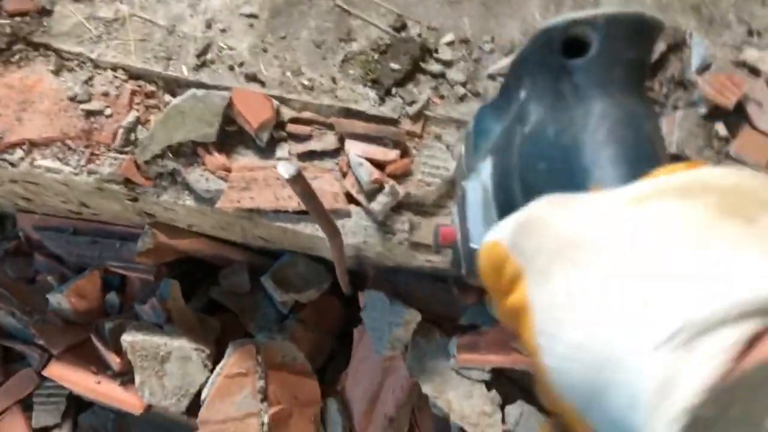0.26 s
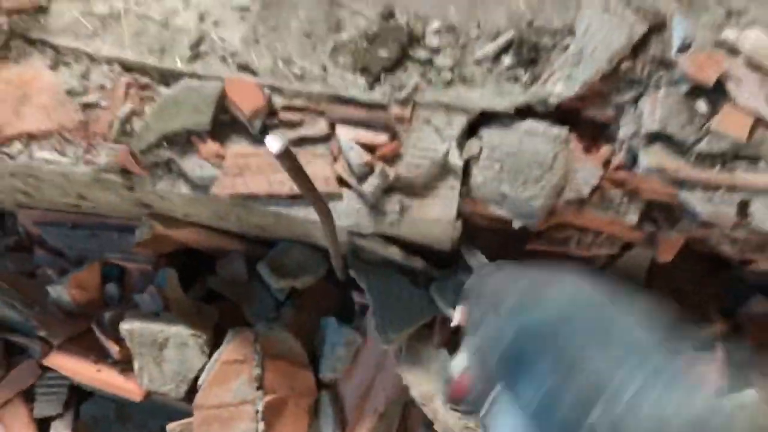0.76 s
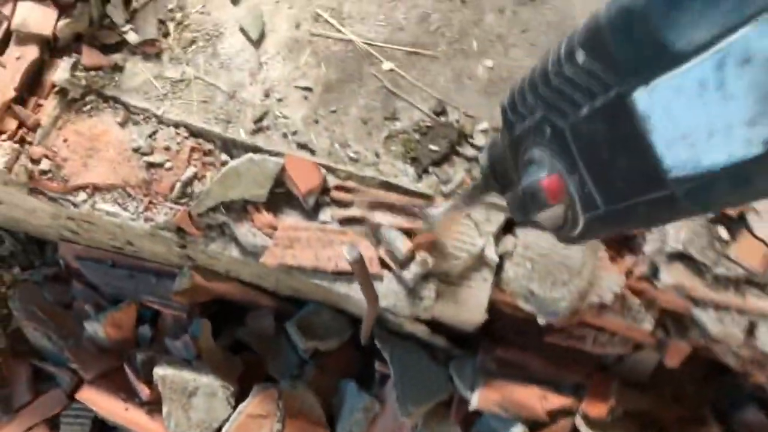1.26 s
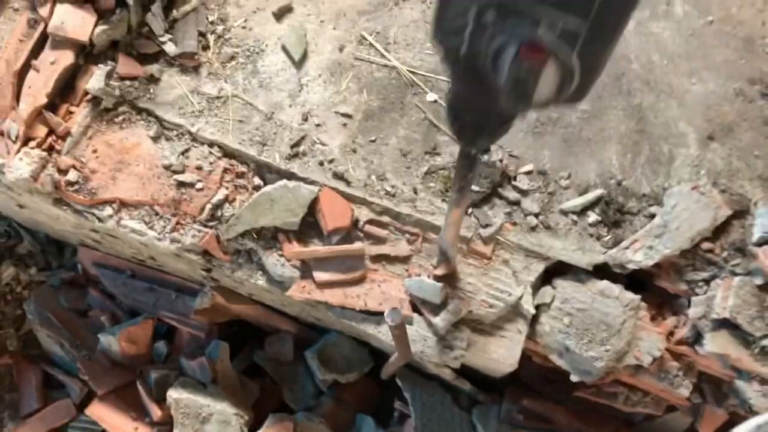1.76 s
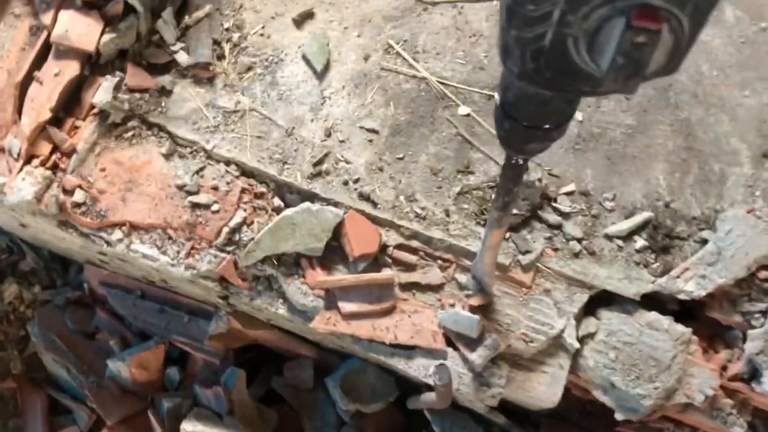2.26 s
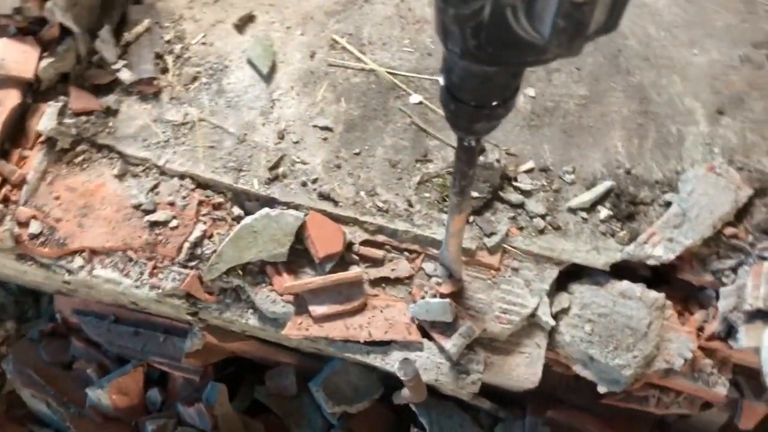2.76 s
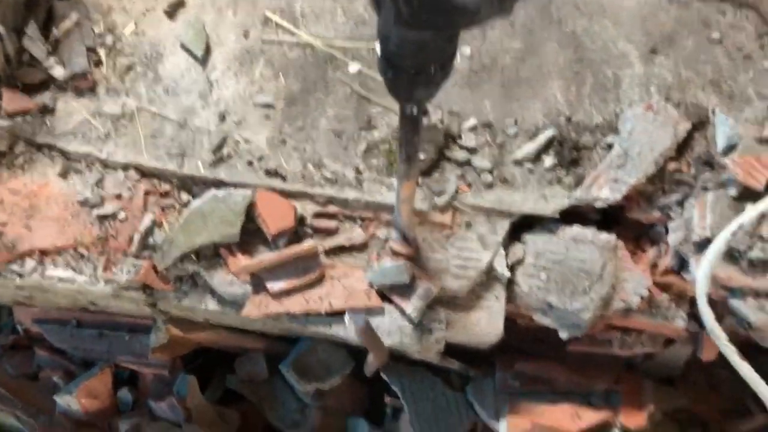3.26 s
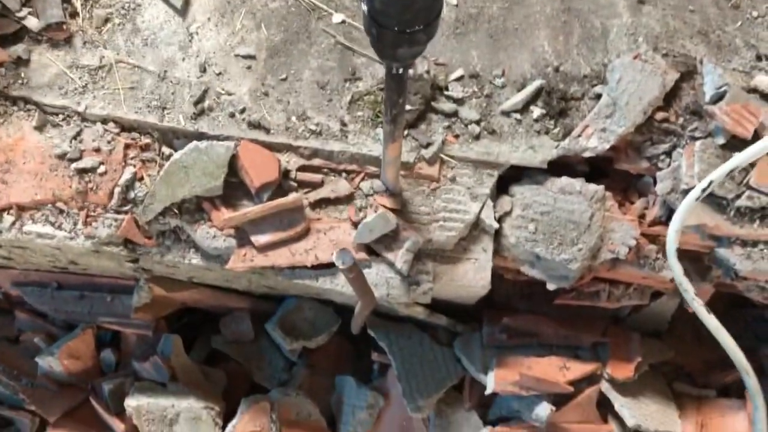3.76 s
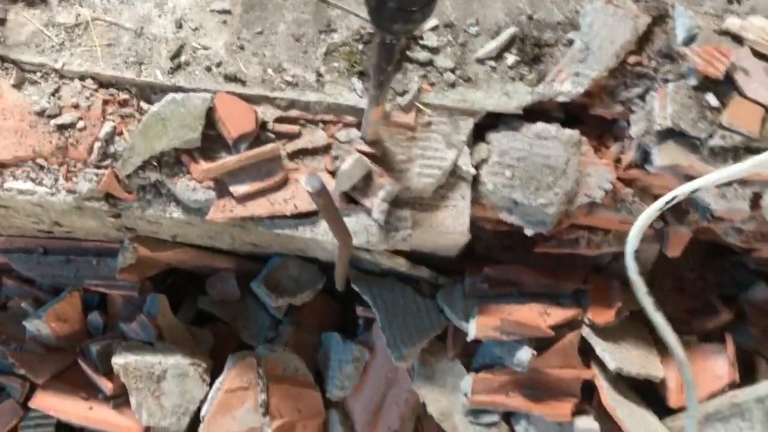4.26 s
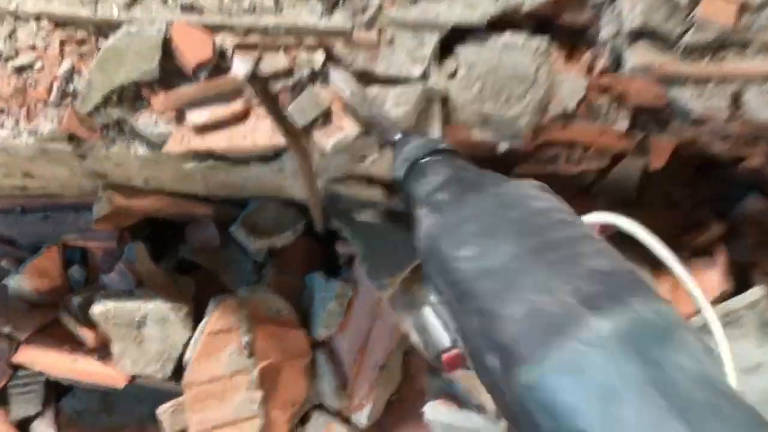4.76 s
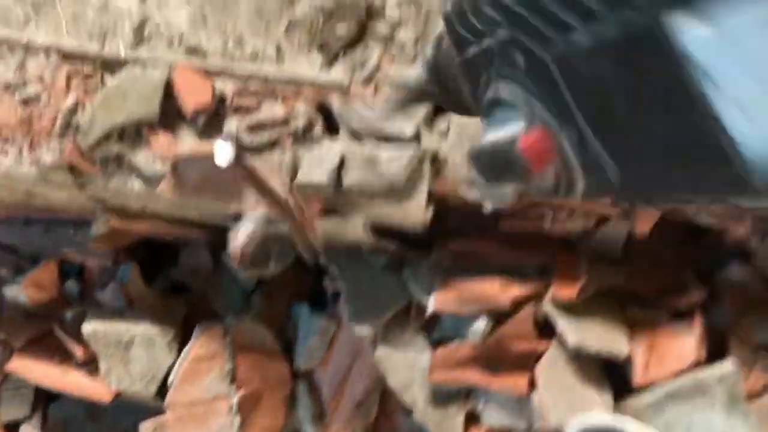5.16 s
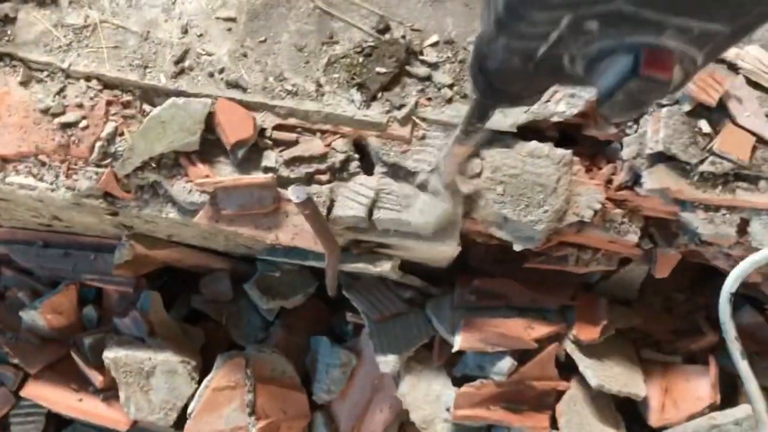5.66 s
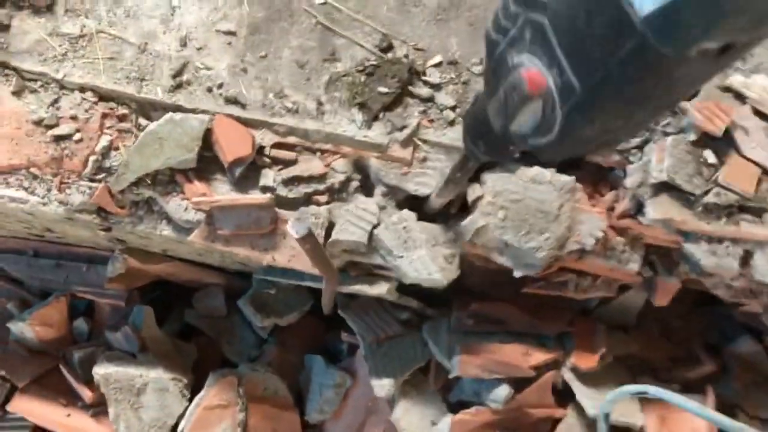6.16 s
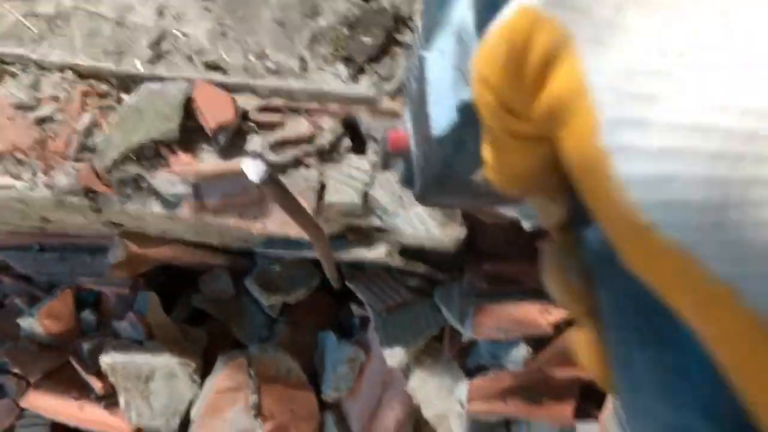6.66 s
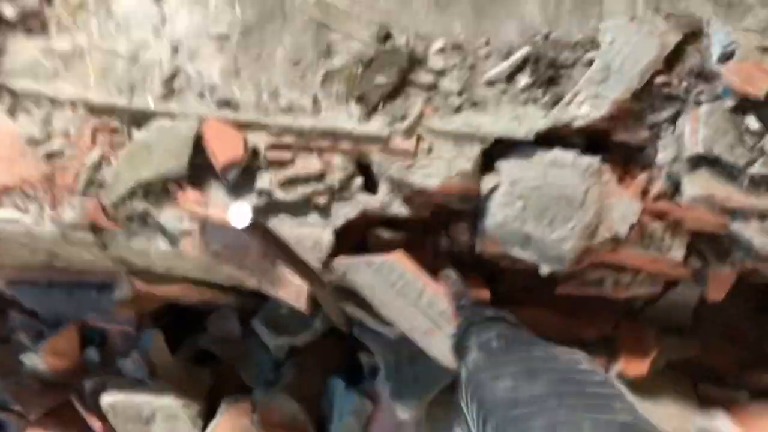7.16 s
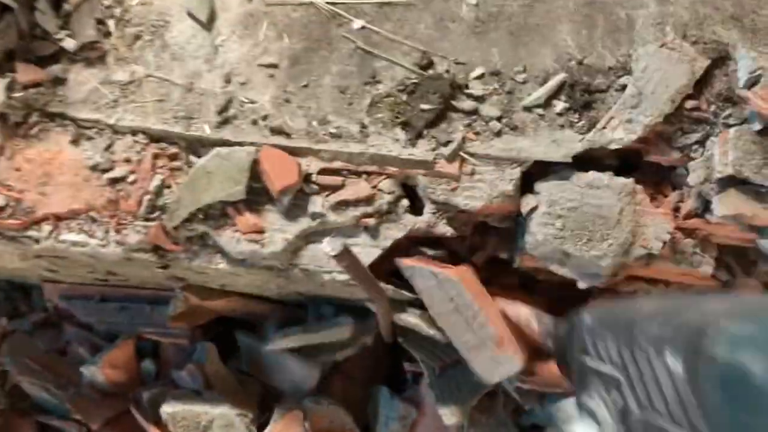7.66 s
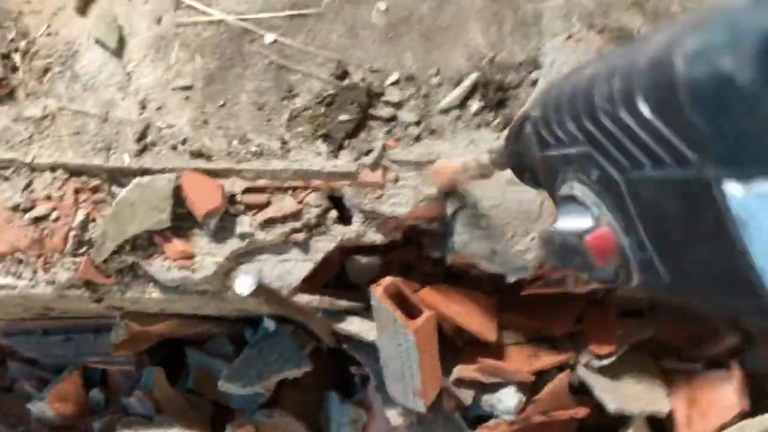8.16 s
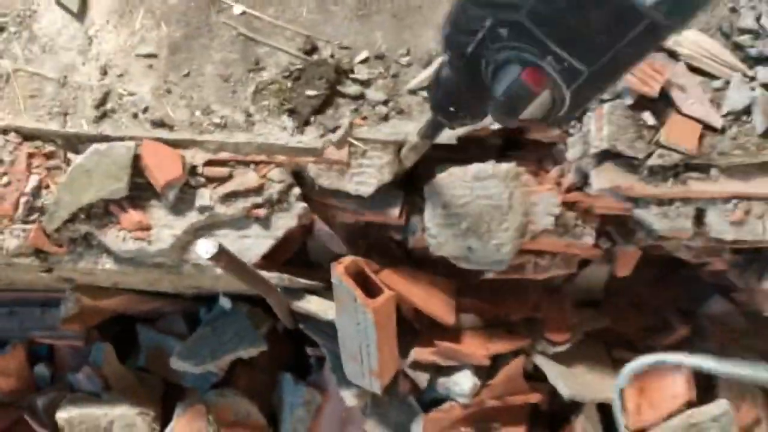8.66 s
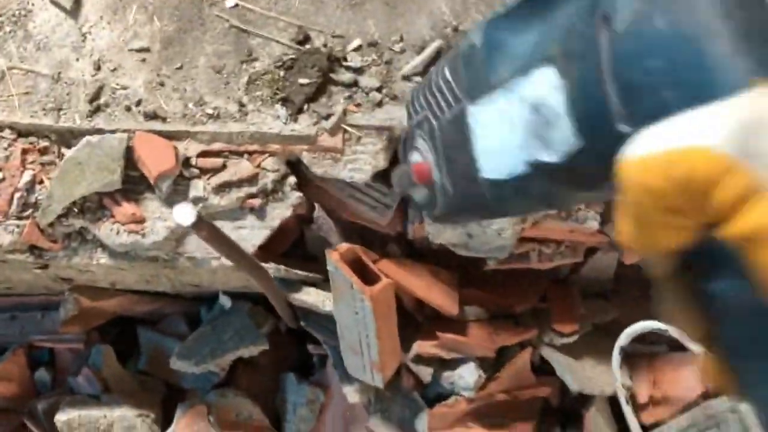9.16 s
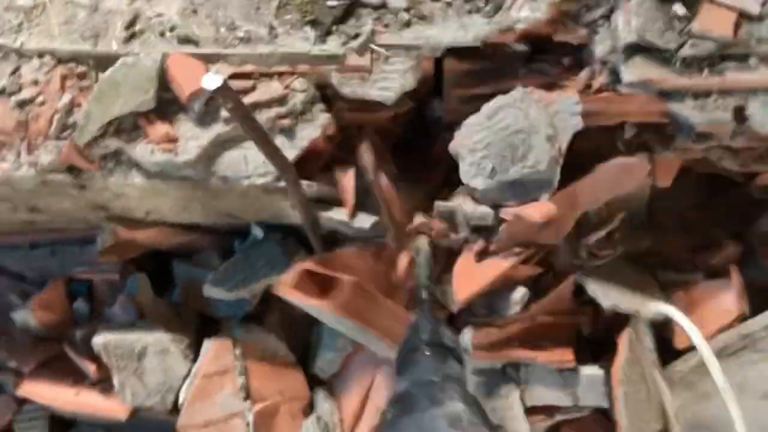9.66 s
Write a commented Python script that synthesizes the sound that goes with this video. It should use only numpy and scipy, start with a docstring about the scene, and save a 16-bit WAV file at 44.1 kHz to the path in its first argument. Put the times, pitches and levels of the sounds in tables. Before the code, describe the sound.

An electric demolition hammer pounds concrete and brick close to the microphone, a very fast, hard rattle with a thin, high ring from the steel chisel. After a brief opening burst it runs free, then hammers steadily for a few seconds, then continues in shorter, uneven bursts. The motor sags under pressure and whines upward with a rush of air whenever it lifts off. Brick shards occasionally snap and clink.

```python
"""Rapid, hard blows of an electric demolition hammer on concrete, close up, broken by short free runs.
Pressed down, the motor sags and each crank turn drives the striker onto the chisel: a thud of concrete
and housing, a crack at the tip, a ring of the steel, at times a clink of brick shards.
Lifted off, the motor speeds up, two whines climb and the loose striker rattles over the fan rush."""
import sys
import numpy as np
from scipy import signal
from scipy.fft import rfft, irfft
from scipy.io import wavfile
from scipy.ndimage import uniform_filter1d

SR = 44100
rng = np.random.default_rng(int(sys.argv[2]) if len(sys.argv) > 2 else 0)


def put_to_file(sound):
    """Save the sound as 16-bit audio at rate SR, in the file named by the first command-line argument."""
    columns = np.atleast_2d(sound).T  # one column per channel
    safe = np.clip(columns, -1, 1)
    whole_steps = np.round(safe * 32767)
    wavfile.write(sys.argv[1], SR, whole_steps.astype(np.int16))


N = 436590
TIME_S = np.arange(N) / SR
HIT_SAMPLES = 1024
HIT_S = np.arange(HIT_SAMPLES) / SR


def amp(db):
    return 10 ** (np.asarray(db) / 20)


def unit_rms(x, axis=None):
    return x / np.sqrt(np.mean(x ** 2, axis, keepdims=True) + 1e-20)


def curves(table, t=TIME_S):
    """Value column(s) of a table, interpolated at times t."""
    times, *columns = np.transpose(table)
    values = [np.interp(t, times, column) for column in columns]
    return values if len(values) > 1 else values[0]


def ramp(start, end):
    return ((TIME_S - start) / (end - start)).clip(0, 1)


def coloured(x, spectrum):
    """Filter the last axis by a (Hz, dB) spectrum."""
    size = x.shape[-1]
    hz, db = np.transpose(spectrum)
    gain_db = np.interp(np.log(np.fft.rfftfreq(size, 1 / SR) + 1), np.log(hz + 1), db)
    return irfft(rfft(x) * amp(gain_db), size)


def wander(width_hz):
    """Complex low-pass noise, rms 1."""
    pole = np.exp(-np.pi * width_hz / SR)
    z = signal.lfilter([1], [1, -pole], rng.standard_normal(N) + 1j * rng.standard_normal(N))
    return z / np.sqrt(np.mean(abs(z) ** 2))


def burst(t, rise_s, t60_s):
    """Envelope: swell from t = 0, exponential decay."""
    t = np.maximum(t, 0)
    return (1 - np.exp(-t / rise_s)) ** 2 * amp(-60 * t / t60_s)


def blow_noise(firm, size, memory_blows):
    """One noise row per blow; share `firm` drifts slowly, the rest is fresh."""
    shape = (len(firm), size)
    slow = signal.lfilter([1], [1, -np.exp(-1 / memory_blows)], rng.standard_normal(shape), axis=0)
    return np.sqrt(firm) * unit_rms(slow, 1) + np.sqrt(1 - firm) * rng.standard_normal(shape)


# Crank speed under load, one list per press: (time [s], speed [turns/s])
PRESS_SPEEDS = [
    [(0, 84.02), (.1, 75.6), (.3, 72.51), (.37, 74.23)],
    [(1.12, 85.25), (1.25, 80.35), (1.45, 76.36), (1.7, 75.8), (2.3, 75.55), (2.8, 75.15), (3.1, 76.12),
     (3.3, 75.8), (3.6, 76.87), (4.0, 76.41), (4.4, 76.12), (4.52, 76.84), (4.67, 73.79)],
    [(5.2, 87.24), (5.32, 85.56), (5.52, 85.13), (5.62, 81.77), (5.8, 85.94), (6.0, 78.66), (6.2, 77.86),
     (6.47, 78.32), (6.82, 72.97)],
    [(8.0, 87.72), (8.2, 83.31), (8.3, 83.88), (8.4, 79.81), (8.5, 83.82), (8.7, 77.61), (8.9, 77.25),
     (9.0, 78.79), (9.2, 76.07), (9.44, 71.85)],
    [(9.9, 86.17)],
]
def crank_turns(start_turn=.895, leap_s=.14, creep_s=.8, leap_share=.7):
    """Running turn count. Speed sags under load; lifted off, it leaps, then creeps up."""
    speed = curves(sum(PRESS_SPEEDS, []))
    for press, next_press in zip(PRESS_SPEEDS, PRESS_SPEEDS[1:]):
        (lift, low), (land, high) = press[-1], next_press[0]
        off = (TIME_S > lift) & (TIME_S < land)
        since = TIME_S[off] - lift
        rise = 1 - leap_share * np.exp(-since / leap_s) - (1 - leap_share) * np.exp(-since / creep_s)
        speed[off] = low + (high - low) * rise / rise[-1]
    return start_turn + np.cumsum(speed) / SR


# Seating of the tip: (time [s], firmness [0-1])
TIP_FIRMNESS = [(0, .5), (1.29, .4), (1.35, .9), (4.4, .94), (4.7, .3), (6.0, .4), (6.8, .45), (8.1, .2),
                (8.6, .4), (9.4, .4)]
def firmness(t):
    """The firmer the tip sits, the more each blow repeats the last."""
    return curves(TIP_FIRMNESS, t)


# Fan air noise: (frequency [Hz], density [dB])
FAN_SPECTRUM = [(25, -58), (60, -38), (150, -18), (600, -8), (1200, -4), (3500, -7.5), (6000, -9),
                (9000, -10.5), (13000, -10), (16500, -12)]
def fan_rush():
    """Broadband air noise with a flickering level."""
    return unit_rms(coloured(rng.standard_normal(N), FAN_SPECTRUM)) * amp(2 * wander(13.6).real)


# Gear and commutator: (crank order, level re rush [dB], width [Hz])
WHINE_ORDERS = [(88.1, -14, 20), (100.6, -11, 100)]
def whines(phase):
    """Two narrow noise bands that track crank speed."""
    return sum(amp(db) * (np.exp(1j * order * phase) * wander(width_hz)).real
               for order, db, width_hz in WHINE_ORDERS)


# Loose striker: (frequency [Hz], density [dB])
RATTLE_SPECTRUM = [(45, -58), (130, -27), (260, -16), (470, -13), (580, -2), (1100, 0), (1400, -3),
                   (1700, -10), (2050, -8), (2550, -14), (3150, -5), (3600, -1), (4050, -4), (4600, -14),
                   (7500, -19), (12000, -35)]
def striker_rattle(phase, knocks_per_s=1500, t60_s=.0034):
    """Random knocks, densest at both ends of the stroke."""
    rate = knocks_per_s * (1 + .5 * np.cos(2 * phase))
    knocks = amp(2.6 * np.minimum(rng.exponential(1, N), 5)) * (rng.random(N) < rate / SR)
    decay = amp(-60 * np.arange(600) / SR / t60_s)
    envelope = np.sqrt(abs(signal.oaconvolve(knocks ** 2, decay ** 2)[:N]))
    return unit_rms(coloured(envelope * rng.standard_normal(N), RATTLE_SPECTRUM))


# Crank tone levels: (time [s], order 1 [dB], upper orders [dB])
HUM_LEVELS = [(0.0, -43, -35), (0.52, -53, -42), (0.91, -44.5, -32.5), (1.68, -43, -34), (1.98, -52, -38.5),
              (2.59, -48, -36.5), (4.3, -59, -55.5), (4.55, -47, -35), (5.13, -48, -34.5),
              (5.43, -47.5, -40.5), (6.64, -51, -32.5), (7.0, -55, -43), (7.69, -42.5, -33.5),
              (9.73, -52, -38), (9.9, -48, -39)]
# Upper tones: (crank order, level re upper orders [dB])
UPPER_ORDERS = [(4, -6.5), (5, -8)]
# Half-speed shaft: (crank order, level re order 2 [dB])
HALF_ORDERS = [(1.5, -14.5), (2.5, -8), (3.5, -12), (6.5, 3)]
def crank_hum(phase, second_db, free):
    """Tones locked to the crank. A firm tip damps order 3; half orders sound off load."""
    first_db, upper_db = curves(HUM_LEVELS)
    loose = 1 - firmness(TIME_S)
    hum = amp(first_db) * (np.exp(1j * phase) * (1 + .44 * wander(16))).real
    hum += amp(second_db) * (np.cos(2 * phase + 1.5) + 1.52 * loose * np.cos(3 * phase))
    for order, db in UPPER_ORDERS:
        hum += amp(upper_db + db) * (np.exp(1j * order * phase) * (1 + .2 * wander(2.5))).real
    hum += free * sum(amp(second_db + db) * np.cos(order * phase) for order, db in HALF_ORDERS)
    return np.sqrt(2) * hum


# Running noise: (time [s], rattle [dB], crank order 2 [dB])
MOTOR_LEVELS = [(0, -26, -38), (.3, -28.5, -45), (.418, -31.5, -52), (1.046, -17.5, -34),
                (1.375, -27.5, -39), (1.545, -32, -37), (2.178, -34.5, -43.5), (4.126, -32.5, -45),
                (4.546, -27, -38), (4.68, -28.5, -58), (5.042, -18, -33.5), (5.3, -21.5, -39),
                (5.78, -20.5, -41), (5.83, -24, -44), (6.27, -23.5, -39.5), (6.76, -25, -41),
                (6.88, -31, -57), (7.2, -29.5, -45.5), (7.605, -19.5, -36), (8.005, -9, -32.5),
                (8.33, -17, -36), (8.41, -16.5, -37), (8.619, -22.5, -37), (9.413, -30, -44),
                (9.643, -26.5, -68), (9.9, -23, -45)]
# Hard shoves against the chisel: (start [s], end [s], final dip [dB])
SHOVES = [(.335, 0.358, 8), (5.303, 5.336, 6.5), (5.803, 5.845, 13), (5.924, 6, 6), (8.2, 8.215, 10),
          (8.306, 8.358, 12.5)]
def motor(turns, free):
    """Rush, rattle, whines and hum. All but the hum dip under a shove."""
    phase = 2 * np.pi * turns
    rattle_db, second_db = curves(MOTOR_LEVELS)
    rush_db = -22.5 + .52 * (rattle_db + 28.5) + 2 * free
    rush = amp(rush_db) * fan_rush()
    rattle = amp(rattle_db) * striker_rattle(phase)
    hum = crank_hum(phase, second_db, free)
    whine = amp(rush_db) * free * whines(phase)
    dip_db = sum(db * ramp(start, end) * (TIME_S < end) for start, end, db in SHOVES)
    return (rush + whine + rattle) * amp(-uniform_filter1d(dip_db, 100)) + hum


# Chuck buzzes: (start [s], end [s], mid level [dB])
BUZZ_SPANS = [(4.85, 5.048, -23), (7.13, 7.27, -26)]
# Chisel in chuck: (frequency [Hz], density [dB])
BUZZ_SPECTRUM = [(9000, -32), (11800, -1), (13200, 5), (14500, -10)]
def chuck_buzz():
    """The loose chisel buzzes in its chuck: swells of fluttering treble noise."""
    swell = sum(amp(db) * np.sin(np.pi * ramp(start, end)) for start, end, db in BUZZ_SPANS)
    noise = unit_rms(coloured(rng.standard_normal(N), BUZZ_SPECTRUM))
    return swell * noise * amp(2.5 * wander(60).real)


# Strongest chisel mode: (time [s], pitch [Hz])
CHISEL_PITCH = [(0, 12820), (.15, 12900), (.25, 13300), (1.2, 12830), (1.4, 12870), (1.9, 13150),
                (2.38, 13150), (2.46, 14300), (3.15, 14050), (3.35, 12760), (3.9, 12850), (4.4, 13300),
                (4.65, 12900), (9.05, 12880), (9.2, 12300), (9.45, 12900)]
def chisel_hz(t):
    """Pitch of the steel, which shifts with how deep it sits."""
    return curves(CHISEL_PITCH, t)


# Light contacts: (start [s], end [s], end level [dB])
SING_SPANS = [(0, .1, -29), (1.222, 1.336, -23), (5.278, 5.32, -27), (8.104, 8.3, -21), (8.448, 8.494, -25)]
def chisel_singing(fade_db=12, width_hz=300):
    """Barely touching, the steel sings on between blows: a fuzzy whistle that fades, then cuts off."""
    level = sum((TIME_S > start) * (TIME_S < end) * amp(db + fade_db * (1 - ramp(start, end)))
                for start, end, db in SING_SPANS)
    phase = 2 * np.pi * np.cumsum(chisel_hz(TIME_S)) / SR
    return uniform_filter1d(level, 200) * (np.exp(1j * phase) * (1 + wander(width_hz))).real


# Loudest brick shards: (time [s], level [dB], pitch [Hz])
SHARD_SNAPS = [(0.277, -6, 5880), (0.2904, -12, 5900), (0.3054, -8, 4430), (5.9823, 0.5, 4680),
               (6.0058, -3, 4300), (6.1205, -6, 4100), (6.1594, -1, 4340), (6.4931, 0, 4610),
               (6.506, -1, 4350), (6.5182, 6, 4220)]
def shards(t60_s=.011):
    """Each shard snaps off with a gritty clink and one overtone."""
    out = np.zeros(N)
    for at, db, hz in SHARD_SNAPS:
        phase = 2 * np.pi * hz * HIT_S
        tone = np.sin(phase) + .52 * np.sin(1.75 * phase)
        grit = .83 + .5 * unit_rms(uniform_filter1d(rng.standard_normal(HIT_SAMPLES), 16))
        out[round(at * SR):][:HIT_SAMPLES] += amp(db) * burst(HIT_S, .00027, t60_s) * tone * grit
    return out


# Piston on striker, striker on chisel, rebound: (delay [s], level slope [dB per 1100 Hz])
IMPACT_STEPS = [(0, -6), (.0026, 0), (.0053, -8)]
TIP_LAG_S = .0016  # tip answers after the housing
TIP_HIT_S = IMPACT_STEPS[1][0] + TIP_LAG_S
def struck_modes(modes, tuning, firm, t=HIT_S):
    """Modes rung by each step of a blow. Softer steps are duller; neighbours start in antiphase."""
    scatter = blow_noise(np.sqrt(firm), 32, memory_blows=31)
    out = 0
    for k, (hz, db, t60_s) in enumerate(modes):
        for j, (delay_s, slope_db) in enumerate(IMPACT_STEPS):
            jitter = scatter[:, [k + 8 * j]]
            phase = 2 * np.pi * hz * tuning * (t - delay_s) + .28 * jitter + np.pi * k
            level_db = db + slope_db * hz / 1100 + 1.5 * jitter
            out = out + amp(level_db) * burst(t - delay_s, .00005, t60_s) * np.sin(phase)
    return unit_rms(out, 1)


def brick_clink(firm):
    """Loose brick under the tip: louder when it slips, higher when wedged."""
    strength, lateness = rng.random((len(firm), 2)).T[:, :, None]
    hz = 3700 + 950 * firm + 250 * blow_noise(firm, 8, memory_blows=12)[:, :1]
    clink = burst(HIT_S - TIP_HIT_S - .002 * lateness, .0003, .006) * np.sin(2 * np.pi * hz * HIT_S)
    return .45 * strength * np.sqrt(1 - firm) * unit_rms(clink, 1)


def chisel_ring(hz, firm, offset_rad):
    """A close pair of lengthwise modes, damped by firm contact with the concrete."""
    phase = 2 * np.pi * hz * HIT_S
    pair = np.sin(phase) + .24 * np.sin(1.022 * phase + offset_rad)
    return unit_rms(burst(HIT_S - TIP_HIT_S + .0013, .0012, .027 - .022 * firm) * pair, 1)


# Crowded modes of chuck and shank: (frequency [Hz], density [dB])
JINGLE_SPECTRUM = [(10500, -14.5), (12000, -6.5), (13200, -12), (14500, -5), (15800, -12)]
# Chisel tip: (frequency [Hz], density [dB])
CRACK_SPECTRUM = [(2500, -1), (4500, -1), (7000, -1.5), (10500, 0.5), (13500, 7.5), (17000, -31)]
def tip_crack(firm):
    """Sharp noise burst at the tip, plus a jingle of chuck and shank."""
    t = HIT_S - TIP_HIT_S
    jingle = blow_noise(firm, HIT_SAMPLES, memory_blows=35) * burst(t + .0006, .0016, .011)
    jingle = unit_rms(coloured(jingle, JINGLE_SPECTRUM), 1)
    envelope = burst(t + .0006, .0009, .011) + .9 * burst(t - .0002, .0002, .004)
    crack = blow_noise(firm, HIT_SAMPLES, memory_blows=18) * envelope
    return unit_rms(coloured(crack, CRACK_SPECTRUM), 1) + (.5 + .44 * firm) * jingle


# Modes of concrete and housing, hollow brick, hard stone: (frequency [Hz], level [dB], t60 [s])
THUD_MODES = [(923, 7, 0.062), (1160, 6.5, 0.0097), (1358, 6.5, 0.041), (1640, 6, 0.0058), (2130, 2, 0.019)]
BOOM_MODES = [(628, 4, 0.17), (754, 2.5, 0.024)]
BITE_MODES = [(2500, 16, 0.0098), (2850, 11.5, 0.0097), (1810, -3.5, 0.015), (3100, 3, 0.018),
              (4680, 1, 0.0051)]
# Mode shift as the tip digs in: (time [s], frequency ratio)
THUD_TUNING = [(0, 1), (1.35, 1.04), (1.6, 0.94), (1.9, 0.99), (2.5, 1.017), (3.2, 1.007), (4.05, 0.98),
               (4.3, 0.938), (6.0, 0.92), (9.0, 1.04), (9.2, 1)]
def ground_thud(at, firm, detune, boom_db, bite_db):
    """Concrete and housing thud, hollow brick booms, hard stone adds bite."""
    tuning = curves(THUD_TUNING, at) * detune
    thud = struck_modes(THUD_MODES, tuning, firm)
    boom = struck_modes(BOOM_MODES, tuning, firm)
    bite = struck_modes(BITE_MODES, tuning, firm, HIT_S - TIP_LAG_S)
    return thud + amp(boom_db) * boom + amp(bite_db) * bite


# Blow levels, one list per contact: (time [s], thud [dB], crack [dB], ring [dB])
CONTACT_LEVELS = [
    [(0, -27, -22, -19), (.12, -25.5, -19, -13.5), (.289, -28, -18.5, -27), (.366, -34, -19, -22)],
    [(1.21, -24, -15, -35), (1.3, -32, -21, -11), (1.335, -26.5, -21, -16), (1.566, -23, -21, -26),
     (1.891, -27, -24.5, -22), (2.19, -23, -23, -20.5), (2.554, -23.5, -20.5, -23),
     (2.873, -24.5, -20.5, -25), (3.233, -25, -22, -23), (3.437, -31, -21.5, -19),
     (4.156, -27.5, -20.5, -24), (4.4, -25.5, -20, -28), (4.67, -40, -18, -15.5)],
    [(5.23, -35, -16, -18), (5.255, -40, -26, -30), (5.28, -27, -19, -20), (5.33, -37, -19, -16)],
    [(5.58, -30, -20, -20.5), (5.67, -44, -24, -15)],
    [(5.79, -35, -23, -17), (6.011, -30, -16, -15), (6.2, -28.5, -20.5, -26), (6.43, -31.5, -16, -14.5),
     (6.585, -33, -16.5, -38), (6.74, -21, -15.5, -28), (6.82, -26, -16, -21.5)],
    [(8.1, -24, -14, -28), (8.28, -40, -18, -21), (8.365, -23, -19, -19)],
    [(8.425, -39, -18, -16), (8.49, -26, -16, -16)],
    [(8.525, -30, -16.5, -14), (8.66, -27, -15.5, -17), (8.895, -29, -20, -15), (9.079, -30, -19.5, -25),
     (9.18, -25.5, -16, -27), (9.46, -25, -17.5, -23)],
]
# Tip skids: (time [s], ring gain [dB], crack loss [dB])
TIP_SKIDS = [(5.961, 6, 11), (6.107, 10, 0), (6.78, 13, 6), (8.206, 9, -1), (8.341, 5, 5), (8.6, 6, 6),
             (9.125, 14, -2)]
def blow_levels(at, skid_half_s=.024):
    """Thud, crack and ring in dB, silent off contact. A skid frees the ring and mostly saps the blow."""
    levels_db = np.full((3, *at.shape), -120.)
    for contact in CONTACT_LEVELS:
        inside = (at >= contact[0][0]) & (at <= contact[-1][0])
        levels_db[:, inside] = curves(contact, at[inside])
    for skid_s, gain_db, loss_db in TIP_SKIDS:
        skid = np.maximum(1 - abs(at - skid_s) / skid_half_s, 0)
        levels_db += np.multiply.outer([-1.6 * loss_db, -loss_db, gain_db], skid)
    return levels_db


def place_hits(hits, start_s):
    """Overlap-add rows with sub-sample timing."""
    first = np.maximum(np.floor(start_s * SR).astype(int), 0)
    shift = np.exp(-2j * np.pi * np.fft.rfftfreq(HIT_SAMPLES) * (start_s * SR - first))
    shifted = irfft(rfft(hits) * shift, HIT_SAMPLES)
    index = first + np.arange(HIT_SAMPLES)
    return np.bincount(index.ravel(), shifted.ravel(), N + HIT_SAMPLES)[:N]


# Material under the tip: (time [s], boom re thud [dB], bite re thud [dB], clink re crack [dB])
GROUND_MIX = [(0, -2.5, -8, -11), (1.3, -4.5, -3, -13), (1.6, -5, -5, 1), (1.8, -7.5, -5, -1),
              (1.9, -5.5, -3.5, 12), (2.6, -6, -1.5, 11), (3.2, -5.5, -7.5, 15), (3.35, -2, -4, 8),
              (4.3, -2, -3, 9), (4.6, 4, 0, -13), (6, -15, 1, 1), (6.3, -12, -13, -2), (6.5, 0, -10, -1),
              (6.7, -0.5, -8, -3), (8.2, 1, -15, -23), (8.9, -2, -2, 8), (9.02, -5, -4, 0),
              (9.15, 1, -26, -15), (9.4, -1.5, -14, -12)]
def hammer_blows(turns):
    """One blow per crank turn in contact. A loose tip scatters pitch, level and timing."""
    at = np.interp(np.arange(1, int(turns[-1])), turns, TIME_S)[:, None]
    firm = firmness(at)
    thud_db, crack_db, ring_db = blow_levels(at)
    boom_db, bite_db, clink_db = curves(GROUND_MIX, at)
    scatter = rng.standard_normal((len(at), 6)) * np.sqrt(1 - firm)
    ring_pitch, ring_level, force, timing, ring_phase, thud_pitch = scatter.T[:, :, None]
    hits = amp(thud_db) * ground_thud(at, firm, 1 + .012 * thud_pitch, boom_db, bite_db)
    hits += amp(crack_db) * tip_crack(firm)
    ring_hz = chisel_hz(at) * (1 + .0066 * ring_pitch)
    hits += amp(ring_db + 4.2 * ring_level) * chisel_ring(ring_hz, firm, 1.8 * ring_phase)
    hits += amp(crack_db + clink_db) * brick_clink(firm)
    hits *= amp(1.8 * force) * np.sqrt(SR / 78 / HIT_SAMPLES)  # row rms to stream rms at 78 blows/s
    highpass = signal.butter(4, 380, "high", fs=SR, output="sos")  # small parts radiate no bass
    return signal.sosfilt(highpass, place_hits(hits, at - TIP_HIT_S + 4e-5 * timing))


def scene():
    """One crank drives blows and motor; mono on two channels."""
    turns = crank_turns()
    touching = sum((TIME_S > rows[0][0]) & (TIME_S < rows[-1][0]) for rows in CONTACT_LEVELS)
    free = uniform_filter1d(1. - touching, 2000)
    mono = hammer_blows(turns) + shards() + motor(turns, free) + chuck_buzz() + chisel_singing()
    return np.tile(mono, (2, 1))


def record(dry):
    """Gain control ducks after the loudest blows; soft clip; low-pass."""
    threshold_db, release_db_per_s, ceiling, cutoff_hz = -13.5, 60, 1.16, 15760
    power_db = 10 * np.log10(abs(uniform_filter1d((dry ** 2).mean(0), 900)) + 1e-12)
    release_db = release_db_per_s * TIME_S
    held_db = np.maximum.accumulate(power_db + release_db) - release_db
    over_db = np.maximum(held_db - threshold_db, 0)
    duck_db = .7 * np.pad(uniform_filter1d(over_db, 300), (500, 0))[:N]  # about one blow late
    soft = ceiling * np.tanh(dry * amp(-duck_db) / ceiling)
    lowpass = signal.firwin(2047, cutoff_hz, window=("kaiser", 9), fs=SR)
    return np.clip(signal.oaconvolve(soft, lowpass[None], "same"), -1, 1)


dry = scene()
out = record(dry)
put_to_file(out)
```